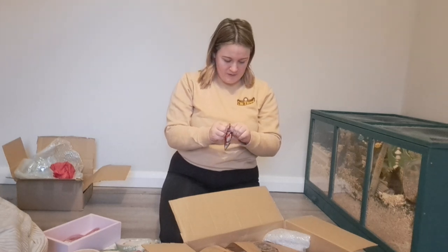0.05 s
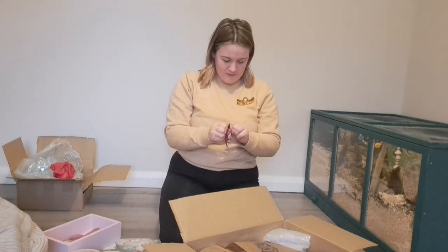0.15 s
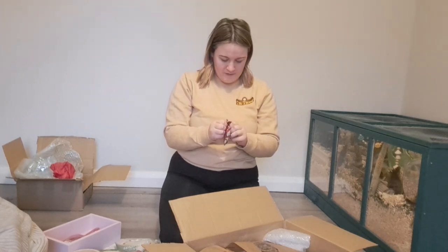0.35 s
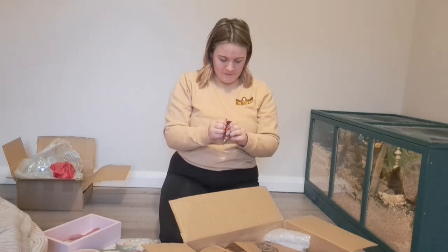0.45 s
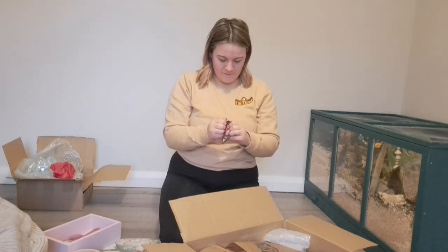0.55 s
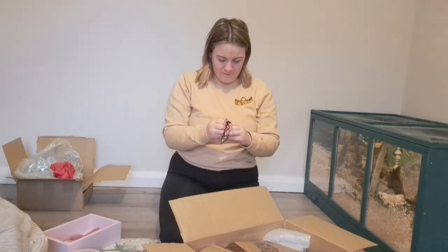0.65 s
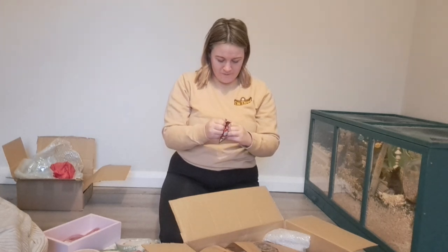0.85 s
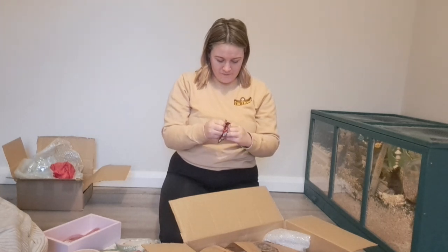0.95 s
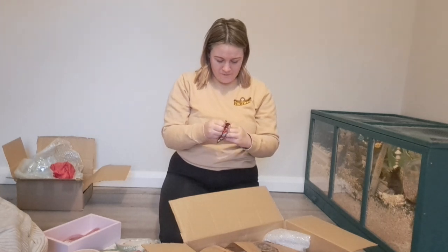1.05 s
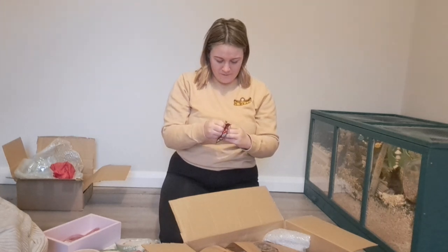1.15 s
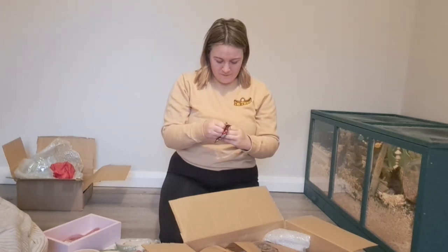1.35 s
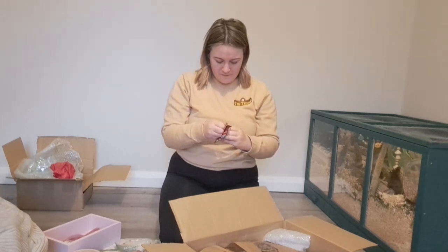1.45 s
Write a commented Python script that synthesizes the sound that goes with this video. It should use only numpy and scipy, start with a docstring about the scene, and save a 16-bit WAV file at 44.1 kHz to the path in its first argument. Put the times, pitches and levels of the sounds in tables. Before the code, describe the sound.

A small plastic packet is pulled open by hand a couple of metres from the microphone: light crackle, a dense burst of snaps, scattered crinkles, another strong snap, then faint ticks in a quiet bare room.

```python
"""A small plastic packet is pulled open by hand, a couple of metres away in a quiet, bare room.
The last of a crackle and two lone snaps come first, then a dense burst from about 0.2 to 0.35 s.
Scattered snaps and crackles follow, with another strong snap near 0.9 s and faint ones to the end.
Buckling creases make the snaps, pulls set off swarms of clicks, and the walls add short bright tails.
Under the steady room tone a low rumble swells most near 0.56 s, then twice more, weaker."""
import sys
import numpy as np
from scipy import signal
from scipy.fft import rfft, irfft
from scipy.io import wavfile

SR = 44100
rng = np.random.default_rng(int(sys.argv[2]) if len(sys.argv) > 2 else 0)


def output_pcm(signal):
    """Save a mono or channel-first signal as 16-bit PCM at the path in sys.argv[1].

    Samples are clipped to [-1, 1] before scaling.
    """
    pcm = np.clip(np.atleast_2d(signal).T, -1, 1) * 32767
    wavfile.write(sys.argv[1], SR, np.round(pcm).astype(np.int16))


N = 66150  # samples, 1.5 s

# steady room tone, relative strength at each pitch: [pitch_hz, level_db]
TONE_COLOUR = [(20, -13), (45, -4), (70, 4.5), (100, -11.5), (200, -9), (400, -10), (800, -23.5),
               (2000, -27.5), (4600, -27), (7300, -20.5), (10000, -31.5), (16000, -24.5)]
# how alike left and right are in the background, 1 = identical: [pitch_hz, likeness]
LEFT_RIGHT_LIKENESS = [(50, 0.95), (150, 0.84), (400, 0.84), (1000, 1), (4000, 0.13)]
# rise and fall of the low rumble, before the left side is lowered: [time_s, level_db]
RUMBLE_LEVEL = [(0, -70.5), (.25, -63.5), (.36, -64), (.46, -58.5), (.56, -55.5), (.61, -76), (.7, -62),
                (.85, -77), (.97, -67), (1.5, -82)]
# relative strength of the rumble at each pitch: [pitch_hz, level_db]
RUMBLE_COLOUR = [(20, -15), (45, -4), (68, -0.5), (105, -15.5), (143, -2), (175, -15.5), (330, -17.5),
                 (700, -38)]
# time the room takes to fade by 60 dB: [pitch_hz, fade_s]
ROOM_FADE = [(300, 0.71), (1000, 0.26), (2200, 0.35), (4000, 0.36), (7500, 0.32), (13000, 0.28)]
# arrival times of the separate wall echoes: [delay_s]
ECHO_DELAYS = [.0038, .0078, .0115, .0145, .0290, .0375]
# colour of the two microphones: [pitch_hz, left_db, right_db]
MIC_COLOUR = [(100.0, 2.5, 1), (740, -2, -1.0), (1590, -0.5, 1.5), (3100, -14, -0.5), (4770, 1, 3.0),
              (6060, -10, -1), (6600, -17, 0), (7580, -13, 4.5), (10500, 0, 0.5), (12500, -1, 0.5),
              (13530.0, -2.5, 7.5), (14900, -30, 4.5), (15700, -4, 7.5)]
# colour the film gives to every snap and crackle: [pitch_hz, level_db]
FILM_COLOUR = [(60.0, -43), (250.0, -5.5), (470.0, -5), (630.0, -7), (1000.0, -2), (1270.0, -0.5),
               (1480.0, 2.0), (2900.0, 1.5), (3700.0, -2.5), (4600.0, -9), (5600.0, 3), (7400.0, 2.0),
               (8700.0, -7.5), (10500.0, -11.5), (12300.0, -8.5), (15500.0, -13.5)]
# pulls that set the film crackling; body to sparkle are relative to the bite:
# [start_s, length_s, level_db, body_db, clack_hz, clack_db, rasp_db, sparkle_db]
PULLS = [(-0.06, 0.069, -8.5, -13, 1900, -6, 5.5, -1), (0.06, 0.15, -25, 5, 1815, 4.5, 5.5, -6),
         (0.199, 0.064, -2.5, -0.5, 2140, -1, 4, 3.5), (0.258, 0.044, 2, -12, 2120, 1, 4, 6.5),
         (0.412, 0.043, -21, 11.5, 1500, 3, 12.5, -8), (0.478, 0.065, -15, -13, 1570, 1.5, 6, 7.5),
         (0.651, 0.032, -14, -7.5, 2240, -1, 6, -7), (0.673, 0.047, -14.5, -2.5, 2580, 6.5, 2, 1.5),
         (0.721, 0.079, -17, -4.5, 2010, 0.5, 6, 1.5), (0.903, 0.035, -14.5, -9, 1910, 12, 10.5, -14),
         (1.068, 0.075, -30.5, -2.5, 2090, 9, 2, -5), (1.247, 0.013, -37, -9, 2100, 19, 4, -5),
         (1.28, 0.046, -29, -5.5, 2000, -16, -11, -3), (1.413, 0.046, -27.5, -6, 2200, -16, -4.5, -7)]
# single creases snapping; aim is extra level straight towards the microphones, the rest as above:
# [start_s, level_db, aim_db, body_db, clack_hz, clack_db, rasp_db, sparkle_db]
SNAPS = [(0.0418, -19, 7.5, 8, 1550, 4.5, 10, -0.5), (0.108, -21.5, 11.5, 10, 1780, -8, -7, -20),
         (0.1863, -5.5, 5.5, -9, 1920, -13, -8, -2.5), (0.214, 0, 10, -5, 1760, -3, -10, -27),
         (0.2213, -13.5, 10.5, 3, 2330, 14.5, -11, -3), (0.2312, -10.5, 0.5, 12, 2500, 7.5, -9, -14),
         (0.254, -4, 7.5, 13.5, 1630, 6.5, 7.5, 1), (0.2679, -5.5, 11.5, 4.5, 1620, 5.5, -2, 5),
         (0.2877, -2.5, 10, 0.5, 1480, 4.5, 5, -7.5), (0.341, -23, 8, 4, 1620, 5, -5, -10),
         (0.4084, -14.5, 7.5, 12, 1734, 15, 8.5, -8), (0.476, -9.5, 6, -8, 1680, -7, 1, 1),
         (0.4998, -10.5, 6, -10, 2490, 1, -10, -2), (0.543, -16, 12, -12, 1620, -4, -8, -0.5),
         (0.6916, -9.5, 4.5, -16.5, 2300, 0, 2, -8), (0.896, 0, 5.5, -9.5, 2160, 3.5, 0, -2),
         (0.931, -10.5, 10.5, -1.5, 2220, 6.5, 4, -9), (1.199, -28.5, -0.5, -4.5, 1950, -5.5, 3.5, -10),
         (1.2374, -29, 3, 0, 2010, 14, 6, -10), (1.2446, -38, 5.5, -3, 2010, 21, 3, -21),
         (1.2942, -20.5, 5, -22, 2030, -23, -22, -21), (1.4267, -28.5, 13, -21, 2000, -24, -14, -21)]

ROOM_TONE_DB, HUM_HZ, HUM_DB = -73.5, 69, -78.5
LEFT_LOW_DB = -3  # the hum and rumble are this much weaker on the left
DIRECT_DB = (-17.5, -14.5)  # sound straight from the packet: left, right
ECHO_DB, TAIL_BUILD_S = -16, 0.0025  # echoes are relative to the whole tail
PATHS = 3  # snaps share three sets of reflections; crackles share three others
BODY_HZ, RASP_HZ, BITE_HZ, SPARKLE_HZ = 846, 3770, 7200, 13250
WIDTHS_OCT = (0.77, 0.55, 0.58, 0.63, 0.68)  # body, clack, rasp, bite, sparkle
VALLEY_DB = -22.5  # level between those resonances
CRACKLES_PER_S, CRACKLE_SPREAD_DB, SWELL_POWER = 700, 8, 0.17
CRACKLE_DB = 1  # added to the level of every pull
FLUTTER_S, EVENNESS = 0.00053, 0.53  # fade time; evenness 1 would flatten the spectrum fully
EDGE_HZ = 16000


def amp(db):
    """Turns decibels into a gain."""
    return 10 ** (np.asarray(db) / 20)


def unit(x):
    """Scales a sound to an average (rms) level of 1."""
    return x / np.sqrt(np.mean(x ** 2) + 1e-20)


def read(points, hz, axis=1):
    """Reads one column of a table between its pitches, along log frequency."""
    table = np.array(points, float)
    return np.interp(np.log(hz + 1), np.log(table[:, 0] + 1), table[:, axis])


def add(mix, start_s, sound):
    """Mixes a sound in at a given time, cutting off what falls outside."""
    at = round(start_s * SR)
    part = mix[max(at, 0):max(at + len(sound), 0)]
    part += sound[max(-at, 0):][:len(part)]


def click(points, axis=1, size=1024):
    """Makes the most compact pulse with a given colour, starting at once (minimum phase)."""
    hz = abs(np.fft.fftfreq(size, 1 / SR))
    log_gain = np.log(amp(read(points, hz, axis=axis)))
    spectrum = np.exp(np.conj(signal.hilbert(log_gain)))
    return np.fft.ifft(spectrum).real[:size // 2]


def noise(colour):
    """Steady coloured noise for left and right, partly shared between them."""
    hz = np.fft.rfftfreq(N, 1 / SR)
    left, other = rfft(rng.standard_normal((2, N)))
    same = read(LEFT_RIGHT_LIKENESS, hz)
    right = same * left + np.sqrt(1 - same ** 2) * other
    return unit(irfft(np.array([left, right]) * amp(read(colour, hz)), N))


def room_tone():
    """The quiet room as steady coloured noise."""
    return amp(ROOM_TONE_DB) * noise(TONE_COLOUR)


def hum():
    """A faint steady low note, a plain sine wave."""
    t = np.arange(N) / SR
    return amp(HUM_DB) * unit(np.sin(2 * np.pi * (HUM_HZ * t + rng.random())))


def rumble():
    """Low noise that swells and sinks along its level table."""
    time_s, level_db = np.transpose(RUMBLE_LEVEL)
    return amp(np.interp(np.arange(N) / SR, time_s, level_db)) * noise(RUMBLE_COLOUR)


def background():
    """Room tone with the hum and rumble, both weaker on the left."""
    balance = np.array([[amp(LEFT_LOW_DB)], [1]])
    return room_tone() + (hum() + rumble()) * balance


def room(x, size=26000):
    """Walls return a few echoes and a dense fading tail, different at each microphone."""
    sides = []
    for _ in range(2):
        # noise split into pitch bands, so that each band can fade at its own speed
        hz, t, bands = signal.stft(rng.standard_normal(size), SR, nperseg=256)
        fade = amp(-60 * t / read(ROOM_FADE, hz)[:, None])
        tail = signal.istft(bands * fade, SR, nperseg=256)[1]
        tail *= 1 - np.exp(-np.arange(len(tail)) / SR / TAIL_BUILD_S)
        tail /= np.linalg.norm(tail)
        for delay_s in ECHO_DELAYS:
            add(tail, delay_s + rng.uniform(-.0003, .0003), amp([ECHO_DB]))
        sides.append(signal.fftconvolve(x, tail)[:N])
    return np.array(sides)


def crease(body_db, clack_hz, clack_db, rasp_db, sparkle_db):
    """One crease's pulse: big facets give body and hollow clack, small ones rasp, bite, sparkle."""
    hz = np.geomspace(50, SR / 2, 200)
    centres_hz = [BODY_HZ, clack_hz, RASP_HZ, BITE_HZ, SPARKLE_HZ]
    levels_db = [body_db, clack_db, rasp_db, 0, sparkle_db]
    power = amp(VALLEY_DB) ** 2
    for centre, db, width in zip(centres_hz, levels_db, WIDTHS_OCT):
        octaves_away = np.log2(hz / centre)
        peak = amp(db) / (1 + (octaves_away / width) ** 2) ** 2
        power = power + peak ** 2
    return click(np.transpose([hz, 10 * np.log10(power)]))


def crackles():
    """Each pull frees a swarm of uneven clicks that grow and fade; returns one sound per path."""
    paths = np.zeros((PATHS, N))
    for k, (start_s, length_s, level_db, *colour) in enumerate(PULLS):
        chance, strength, sign = rng.random((3, int(length_s * SR)))
        swell = np.sin(np.pi * np.linspace(0, 1, len(chance))).clip(0) ** SWELL_POWER
        # many small clicks and a few large ones, with a ceiling
        sizes = amp(-CRACKLE_SPREAD_DB * np.log(np.maximum(strength, np.exp(-3))))
        happens = chance < CRACKLES_PER_S / SR
        swarm = happens * np.sign(sign - .5) * sizes * swell
        swarm /= np.linalg.norm(swarm) + 1e-9
        add(paths[k % PATHS], start_s, amp(level_db) * np.convolve(swarm, crease(*colour)))
    return amp(CRACKLE_DB) * paths


def snaps(size=256):
    """Creases buckle with a brief flutter; returns the direct sound and one sound per path."""
    straight, paths = np.zeros(N), np.zeros((PATHS, N))
    t = np.arange(size) / SR
    for k, (start_s, level_db, aim_db, *colour) in enumerate(SNAPS):
        burst = rng.standard_normal(size) * np.exp(-t / FLUTTER_S)
        spectrum = rfft(burst, 2 * size)
        flutter = irfft(spectrum / abs(spectrum) ** EVENNESS)[:size]
        flutter /= np.linalg.norm(flutter)
        snap = amp(level_db) * np.convolve(flutter, crease(*colour))
        add(straight, start_s, amp(aim_db) * snap)
        add(paths[k % PATHS], start_s, snap)
    return straight, paths


def scene():
    """The packet, direct and reflected, coloured by film and microphones, over the background."""
    straight, snap_paths = snaps()
    crackle_paths = crackles()
    direct = amp(DIRECT_DB)[:, None] * (straight + crackle_paths.sum(0))
    reflected = sum(room(x) for x in [*snap_paths, *crackle_paths])
    film = click(FILM_COLOUR)
    colour = np.array([np.convolve(film, click(MIC_COLOUR, axis=column)) for column in (1, 2)])
    packet = signal.fftconvolve(direct + reflected, colour, axes=1)[:, :N]
    return packet + background()


def record(dry):
    """The recorder's band limit: a steep filter removes the highest treble."""
    low_pass = signal.firwin(511, EDGE_HZ, window=("kaiser", 9), fs=SR)
    return signal.oaconvolve(dry, low_pass[None], "same")


dry = scene()
out = record(dry)
output_pcm(out)
```